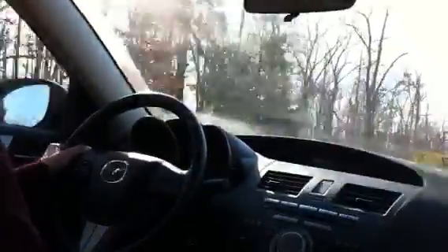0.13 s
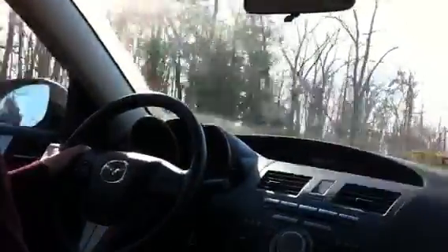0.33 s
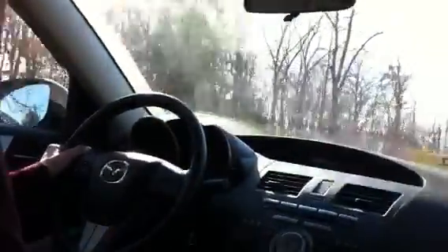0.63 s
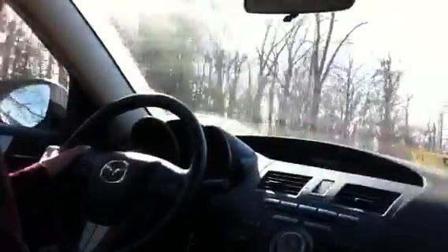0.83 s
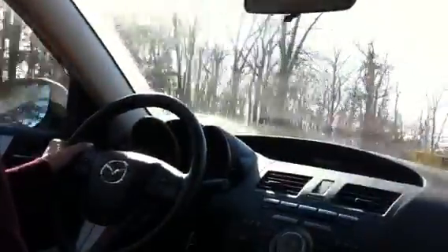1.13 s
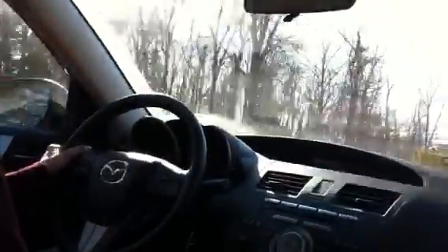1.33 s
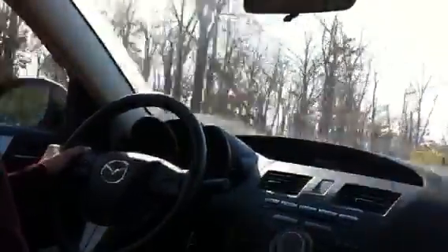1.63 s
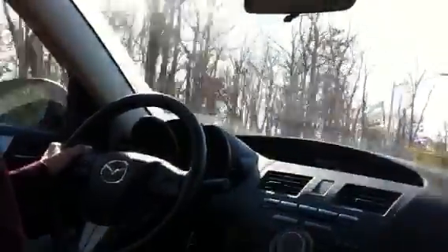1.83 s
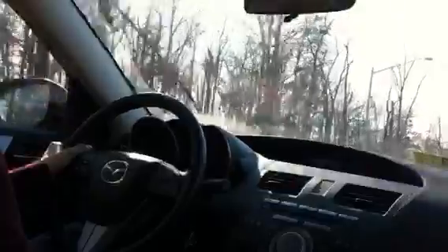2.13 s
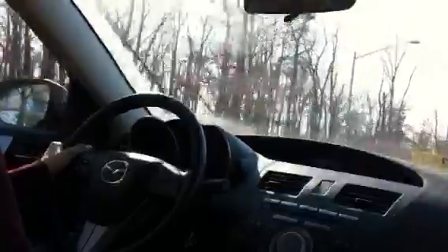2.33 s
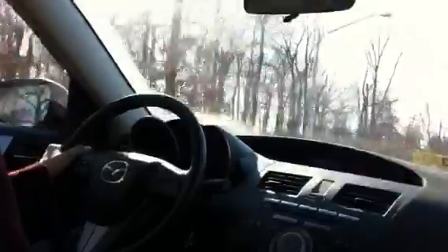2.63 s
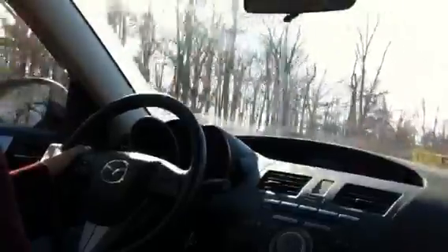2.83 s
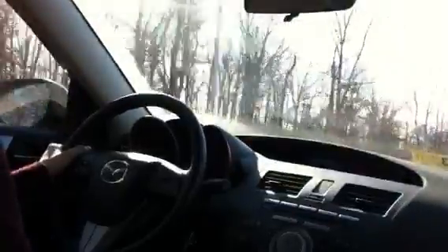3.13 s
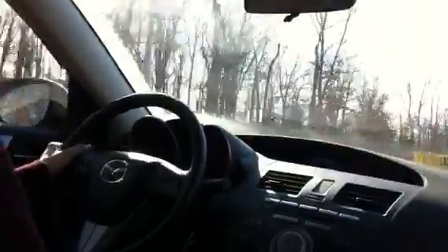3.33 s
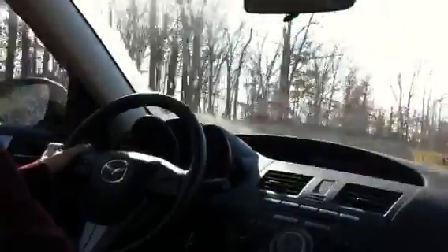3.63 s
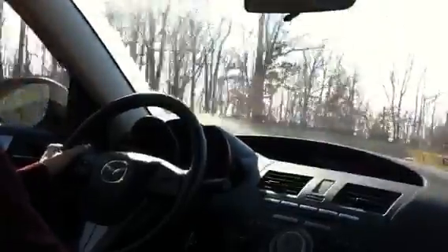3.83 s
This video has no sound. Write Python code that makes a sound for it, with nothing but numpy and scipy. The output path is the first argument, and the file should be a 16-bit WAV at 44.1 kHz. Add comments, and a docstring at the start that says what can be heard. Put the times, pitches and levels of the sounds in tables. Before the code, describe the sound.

Turbo car engine droning and climbing over road rumble, ending in two fluttering puffs and hiss

```python
"""Inside a turbocharged four-cylinder car: firing orders boom over road roar, and an early knock and two trim
clicks sound as intake air hisses through the ducts. The engine pulls in gear, its pitch climbing, while the
turbo adds a thin whistle. A loose part ticks in pairs, then the throttle shuts: the compressor flutters twice
as resonant puffs of noise, the air vents as coloured noise, and a last knock lands as the pitch falls."""
import sys
import numpy as np
from scipy import signal
from scipy.io import wavfile
from scipy.ndimage import uniform_filter1d

SR = 44100
rng = np.random.default_rng(int(sys.argv[2]) if len(sys.argv) > 2 else 0)


def magnitude_from_level(level_db):
    """Linear magnitude for a level in decibels (20 dB per decade)."""
    exponent = np.asarray(level_db, float) / 20
    return 10 ** exponent


def unload_wav(signal):
    """Save mono or channel-first audio to the path in sys.argv[1] as 16-bit WAV at rate SR, clipped to [-1, 1]."""
    wavfile.write(
        sys.argv[1],
        SR,
        np.round(np.clip(np.atleast_2d(signal).T, -1, 1) * 32767).astype(np.int16),
    )


N = 176400
T = np.arange(N) / SR  # seconds

# Engine pull and lift-off. Each row: time in seconds, firing rate in Hz, levels of orders 1, 2 and 3 in dB.
ENGINE_ORDERS = [(0, 78.33, -37.5, -55, -50.5), (.28, 74.03, -45, -43, -36),
                 (.45, 72.51, -52, -50.5, -44.5), (.53, 70.7, -48, -36, -30),
                 (.62, 69.97, -44, -33.5, -31.5), (.8, 70.8, -44, -32, -34.5), (1.08, 72.57, -39, -31, -28),
                 (1.5, 75.97, -37.5, -30.5, -33), (1.9, 78.28, -34, -34, -34),
                 (2.1, 79.77, -33.5, -42, -41), (2.3, 82.68, -29, -29, -37),
                 (2.62, 85.06, -27.5, -30.5, -40), (3.1, 89.86, -26.5, -36, -38),
                 (3.18, 91.04, -28, -40, -38.5), (3.28, 91.25, -29.5, -58, -37), (3.4, 90.1, -42, -45, -59),
                 (3.5, 88.77, -39, -64, -51), (4, 73.3, -41.5, -63, -42)]
# Spectrum of intake air. Each row: frequency in Hz, relative density in dB per Hz.
AIR_COLOUR = [(1000, -19.5), (2000, 2.5), (2350, -10.5), (2850, 5.5), (3300, -2.5), (4050, -13.5),
              (4350, -3.5), (5400, -17.5), (6150, -11), (7500, -19.5), (13500, -40), (15700, -44)]
# Duct resonances. Each row: frequency in Hz, basic width in Hz, relative level in dB.
DUCT_MODES = [(328.6, 11.7, 14), (690, 41, -3.5), (960, 17, -2.5), (1365, 11, -3), (1484, 11.6, 2.5),
              (1646, 8.9, -0.5), (2041, 20, -2.5), (2540, 12, -4), (2640, 7.1, -5), (2775, 14, -0.5),
              (3047, 6.9, -4.5), (3840, 140, -13)]
# Intake flow. Each row: time in seconds, relative level in dB.
AIR_FLOW = [(0, -54.5), (.2, -59.5), (.4, -76.5), (1.08, -66.5), (1.8, -58), (2.3, -54.5), (2.75, -52.5),
            (3.2, -50.5), (3.4, -52.5), (3.57, -52.5), (3.75, -58), (4, -78)]
# Ringing of the ducts as boost builds and goes. Each row: time in seconds, relative level in dB.
BOOST_RING = [(.4, -2), (1.2, 4.5), (3.3, 2), (3.45, 5.5)]
# Turbo whistle. Each row: time in seconds, centre pitch in Hz, centre level in dB.
WHISTLE_PATH = [(1.5, 7950, -88), (1.87, 9170, -72), (2.1, 10000, -77), (2.3, 10750, -78),
                (2.45, 11400, -84), (2.54, 11720, -72), (2.72, 11650, -70), (2.85, 11600, -92)]
# Compressor surge puffs. Each row: peak in seconds, relative level in dB, rise in seconds, fall in seconds,
# lag of the low resonances in seconds per octave.
SURGE_PUFFS = [(3.248, -36, .016, .014, .009), (3.307, -39, .014, .03, .026)]
# Venting air. Each row: time in seconds, level in dB.
VENT_LEVEL = [(3.405, -70.5), (3.425, -48.5), (3.48, -46.5), (3.52, -51), (3.57, -53.5), (3.6, -68),
              (3.8, -67)]
# Spectrum of vented air and puff hiss. Each row: frequency in Hz, relative density in dB per Hz.
VENT_SPECTRUM = [(1500, -6), (2900, 0), (5700, -14), (7000, -12), (13200, -20), (15700, -28)]
# Driveline knocks. Each row: start in seconds, level in dB, brightness of the clack in dB.
KNOCK_HITS = [(0.285, -18, -36), (3.551, -16, -6.5)]
# Modes of the body boom, then of the clack. Each row: frequency in Hz, relative level in dB, T60 in seconds.
BOOM_MODES = [(150, -1, 0.06), (200, -5, 0.13)]
CLACK_MODES = [(760, 7, 0.022), (1230, 2, 0.014)]
# Rattle of a loose part. Each row: time in seconds, relative level in dB.
TICK_LEVEL = [(3.13, -51), (3.18, -43), (3.3, -42), (3.33, -50)]
# Clicks of trim. Each row: start in seconds, relative level in dB.
TRIM_CLICKS = [(.566, -37), (0.825, -35)]
# Spectrum of road and body roar. Each row: frequency in Hz, relative density in dB per Hz.
ROAD_COLOUR = [(40, -24), (60, -23.5), (80, -28), (105, -2.5), (140, -3.5), (210, -0.5), (270, -5.5),
               (420, -6.5), (520, -13.5), (700, -14.5), (1200, -24), (2700, -36.5), (15500, -81.5)]
# Swell of the roar. Each row: time in seconds, relative level in dB.
ROAR_SWELL = [(0, -40), (.45, -42), (.6, -39.5), (2, -38), (2.7, -34.5), (3.15, -35), (3.33, -30.5),
              (3.45, -35.5), (3.7, -38), (4, -38)]

PULSING = 0.13  # depth of the air's pulse at each firing


def evened(x):
    """Scales to rms 1."""
    return x / np.sqrt(np.mean(x ** 2) + 1e-20)


def curve(table, column=1):
    """One column of a table, joined by straight lines over time."""
    rows = np.array(table)
    return np.interp(T, rows[:, 0], rows[:, column])


def drift(rate_hz):
    """Random wandering of rms 1, low-passed at rate_hz."""
    b, a = signal.butter(2, rate_hz, fs=SR)
    return evened(signal.lfilter(b, a, rng.standard_normal(N)))


def noise(colour, patchy_db):
    """Noise of a given spectrum with drifting louder and softer patches, rms 1."""
    bins_hz = np.fft.rfftfreq(1024, 1 / SR)
    hz, db = np.transpose(colour)
    real, imaginary, patches = rng.standard_normal((N // 256 + 5, 513, 3)).T
    patches = uniform_filter1d(patches, 10, 0)  # blurred across frequency
    patches = evened(uniform_filter1d(patches, 12, 1))  # blurred over time
    tone_db = np.interp(np.log(bins_hz + 1), np.log(hz + 1), db)[:, None]
    spectrum = (real + 1j * imaginary) * magnitude_from_level(tone_db + patchy_db * patches)
    return evened(signal.istft(spectrum, nperseg=1024, noverlap=768)[1][:N])


def resonate(x, hz, width_hz):
    """A resonance that may follow a moving frequency: shift down to 0 Hz, smooth, shift back up."""
    turn = np.exp(2j * np.pi * np.cumsum(hz * np.ones(N)) / SR)
    r = np.exp(-np.pi * width_hz / SR)
    return 2 * (turn * signal.lfilter([1 - r], [1, -r], x / turn)).real


def band(x, lo_hz, hi_hz):
    """Band-pass."""
    return signal.sosfilt(signal.butter(2, [lo_hz, hi_hz], "band", fs=SR, output="sos"), x)


def engine(turns):
    """Firing orders locked in phase, so that each firing is one pulse; the upper two waver in level."""
    # the waver deepens under full load from 1.9 to 2.5 s, then stays deep
    waver_db = 0.7 + np.interp(T, [1.9, 2.5], [0, 1.1])
    out = np.zeros(N)
    for order in (1, 2, 3):
        level_db = curve(ENGINE_ORDERS, column=order + 1)
        sway_db = waver_db * (order - 1) * drift(10)  # none on order 1, double on order 3
        out += np.sqrt(2) * magnitude_from_level(level_db + sway_db) * np.cos(2 * np.pi * order * turns)
    return out


def intake(turns):
    """Turbulent air: noise rings the duct resonances and hisses broadly, pulsing with each firing."""
    duct_db, broad_db, wander = 6.5, -2, 0.004  # wander: rms share of each resonance's frequency
    pulse = 1 + PULSING * np.cos(2 * np.pi * turns)
    drive = rng.standard_normal(N) * pulse
    ducts = np.zeros(N)
    for hz, width_hz, db in DUCT_MODES:
        moving_hz = hz * (1 + wander * drift(1.93))
        ducts += magnitude_from_level(db) * evened(resonate(drive, moving_hz, width_hz))
    ringing = magnitude_from_level(duct_db + curve(BOOST_RING)) * evened(ducts)
    broad = magnitude_from_level(broad_db) * noise(AIR_COLOUR, patchy_db=0.5) * pulse
    return magnitude_from_level(curve(AIR_FLOW)) * (ringing + broad)


def whistle():
    """The compressor wheel's thin tone: a sine that climbs, then eases, unsteady in pitch and level."""
    on = (T > WHISTLE_PATH[0][0]) & (T < WHISTLE_PATH[-1][0])
    pitch_hz = curve(WHISTLE_PATH) + 15 * drift(40)
    level_db = curve(WHISTLE_PATH, column=2) + 3 * drift(15)
    return on * magnitude_from_level(level_db) * np.sin(2 * np.pi * np.cumsum(pitch_hz) / SR)


def puffs(octaves):
    """Level of the surge puffs for a resonance so many octaves below 3 kHz: lower ones peak later."""
    out = np.zeros(N)
    for peak_s, db, rise_s, fall_s, lag_s in SURGE_PUFFS:
        u = T - peak_s - lag_s * octaves
        out += magnitude_from_level(db) * np.exp(-0.5 * (u / np.where(u < 0, rise_s, fall_s)) ** 2)
    return out


def flutter():
    """Air surging back through the ducts: each puff rings broadened resonances and adds hiss."""
    lowest_hz, widen, tilt_db, hiss_db = 600, 6, -1.5, -11  # tilt: per octave below 3 kHz
    drive = rng.standard_normal(N) * magnitude_from_level(3 * drift(120))
    out = np.zeros(N)
    for hz, width_hz, db in DUCT_MODES:
        if hz <= lowest_hz:
            continue
        octaves = np.log2(3000 / hz)
        ring = resonate(drive, hz, widen * width_hz)
        ring = evened(resonate(ring, hz, widen * width_hz))
        out += magnitude_from_level(db + tilt_db * octaves + 1.2 * drift(25)) * puffs(octaves) * ring
    return out + magnitude_from_level(hiss_db) * puffs(0) * noise(VENT_SPECTRUM, patchy_db=1.2)


def vent():
    """Boost air hissing out: coloured noise under a quick swell and fade."""
    return magnitude_from_level(curve(VENT_LEVEL)) * noise(VENT_SPECTRUM, patchy_db=1.2)


def knocks():
    """Dull blows in the driveline: decaying modes give a short clack, then the body booms."""
    body_lag_s, attack_s = 0.006, 0.004
    out = np.zeros(N)
    for start_s, db, bright_db in KNOCK_HITS:
        clack = (CLACK_MODES, db + bright_db, 0)
        boom = (BOOM_MODES, db, body_lag_s)
        for modes, level_db, lag_s in (clack, boom):
            u = np.maximum(T - start_s - lag_s, 0)
            attack = np.minimum(u / attack_s, 1)
            for hz, mode_db, t60_s in modes:
                decay = magnitude_from_level(level_db + mode_db - 60 * u / t60_s)
                out -= attack * decay * np.sin(2 * np.pi * hz * u)
    return out


def ticking():
    """A loose part rattling: two sharp band-passed impulses in each cycle, uneven in strength."""
    first_s, every_s, gap_s, spread_db = 3.015, 0.033, 0.011, 1.5
    at_s = first_s + every_s * np.arange(10)[:, None] + [0, gap_s]
    impulses = np.zeros(N)
    impulses[(at_s * SR).astype(int)] = magnitude_from_level(spread_db * rng.standard_normal(at_s.shape))
    return 10 * band(impulses * magnitude_from_level(curve(TICK_LEVEL)), 2800, 7000)


def clicks():
    """Small clicks of trim: fast-decaying noise bursts through two broad resonances."""
    decay_s, width_hz = 0.005, 900
    shape = np.zeros(N)
    for start_s, db in TRIM_CLICKS:
        shape += magnitude_from_level(db) * (T > start_s) * np.exp(-np.maximum(T - start_s, 0) / decay_s)
    out = np.zeros(N)
    for hz in (1750, 3700):
        burst = shape * rng.standard_normal(N)
        out += resonate(resonate(burst, hz, width_hz), hz, width_hz)
    return out


def road():
    """Tyre and body roar: mostly low coloured noise that swells and sinks."""
    return magnitude_from_level(curve(ROAR_SWELL) + 4) * noise(ROAD_COLOUR, patchy_db=0.5)


def scene():
    """Everything heard in the cabin; engine and intake share one count of firings."""
    turns = np.cumsum(curve(ENGINE_ORDERS)) / SR
    mix = engine(turns) + intake(turns) + whistle() + flutter() + vent()
    mix = mix + knocks() + ticking() + clicks() + road()
    return mix[None]


def top_cut(x):
    """Nothing passes above the cut-off."""
    return signal.sosfilt(signal.butter(12, 15700, fs=SR, output="sos"), x)


def record(dry):
    """A small microphone cuts the bass and adds hiss; a steep low-pass then trims the top."""
    bass_cut = signal.butter(4, 56.6, "high", fs=SR, output="sos")
    x = signal.sosfilt(bass_cut, dry)
    x = x + magnitude_from_level(-70.5) * rng.standard_normal(dry.shape)  # hiss
    low_pass = signal.firwin(511, 15750, window=("kaiser", 9), fs=SR)
    x = signal.oaconvolve(x, low_pass[None], "same")
    return top_cut(x)


dry = scene()
out = record(dry)
unload_wav(out)
```